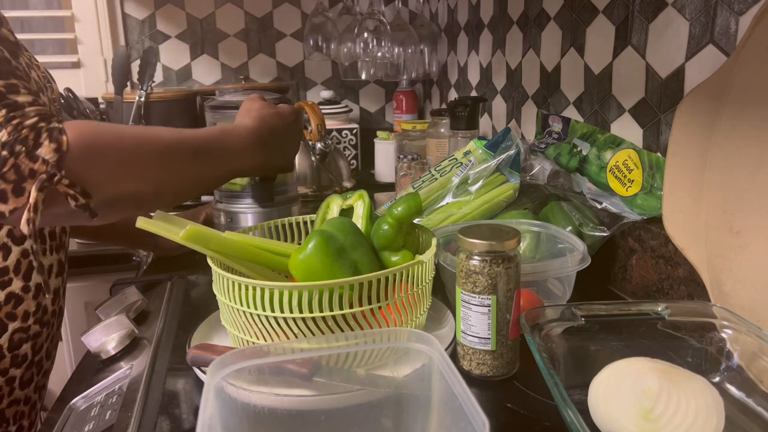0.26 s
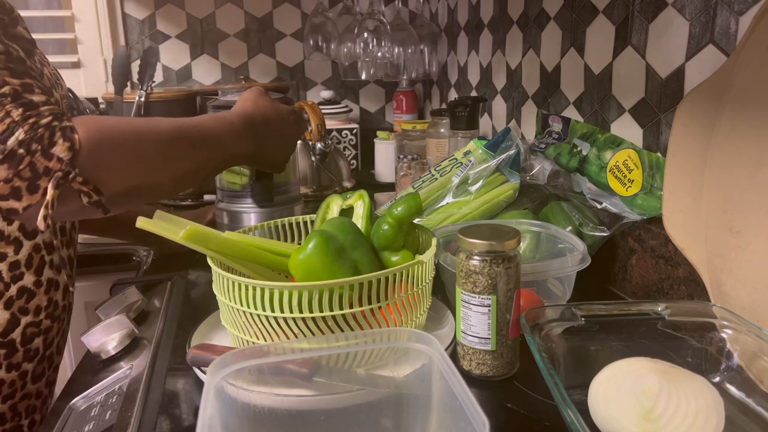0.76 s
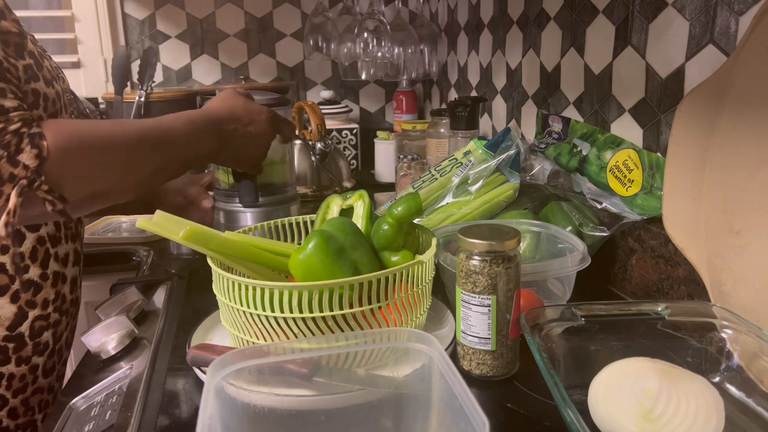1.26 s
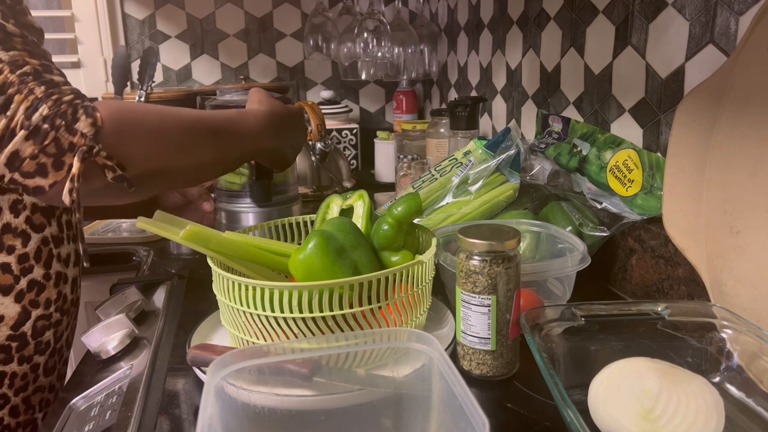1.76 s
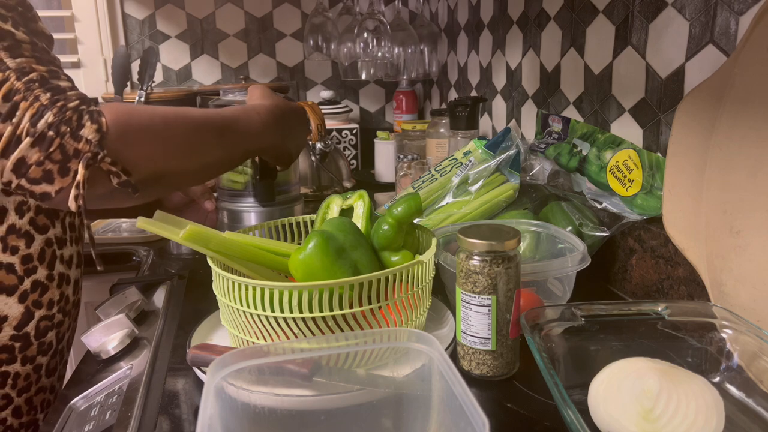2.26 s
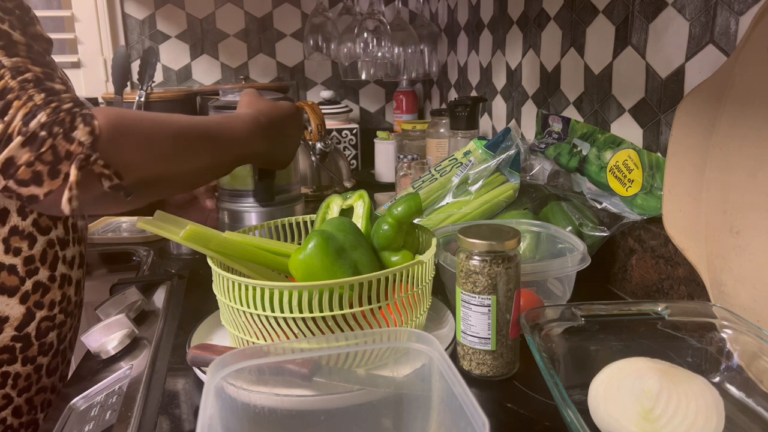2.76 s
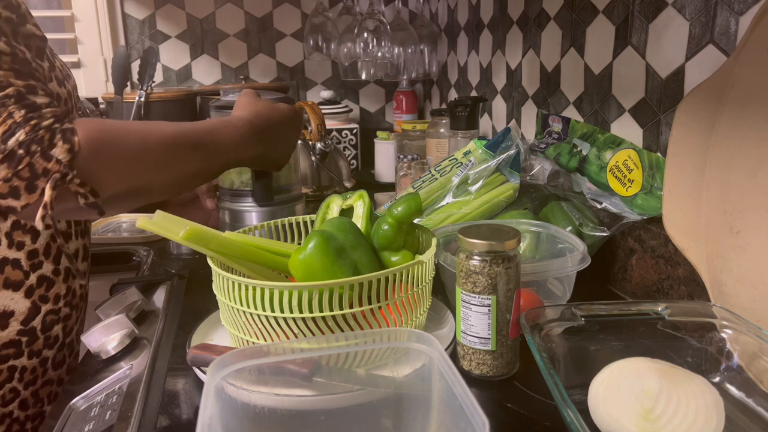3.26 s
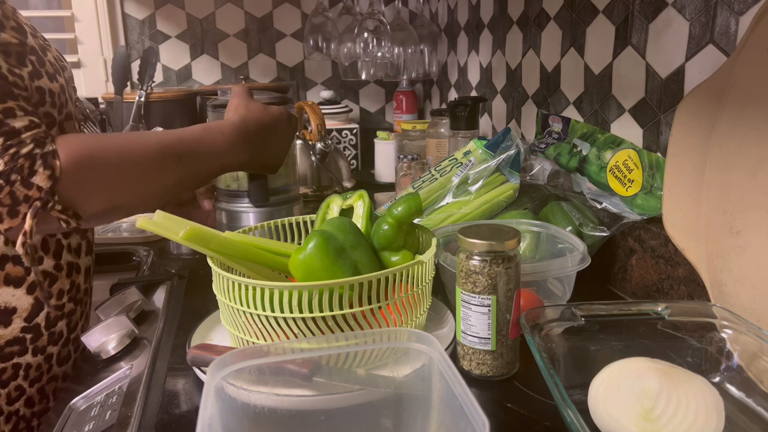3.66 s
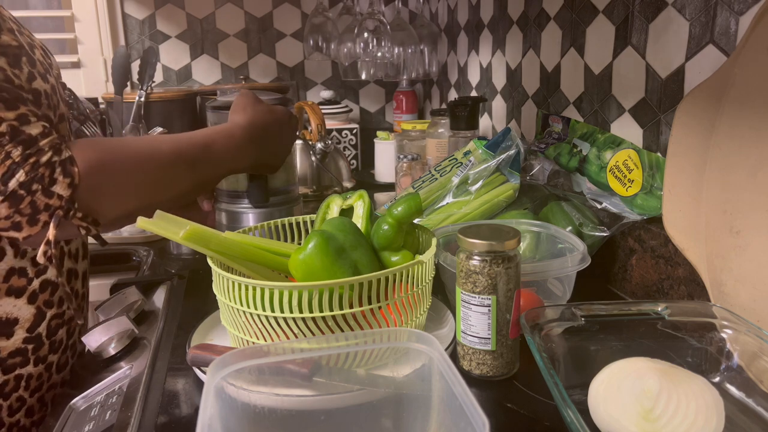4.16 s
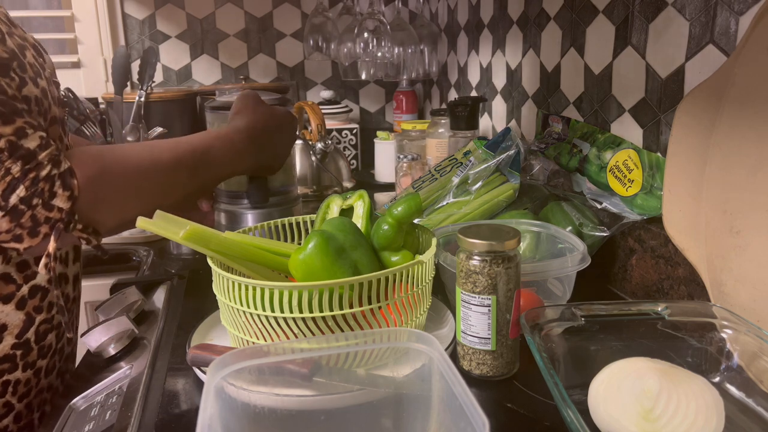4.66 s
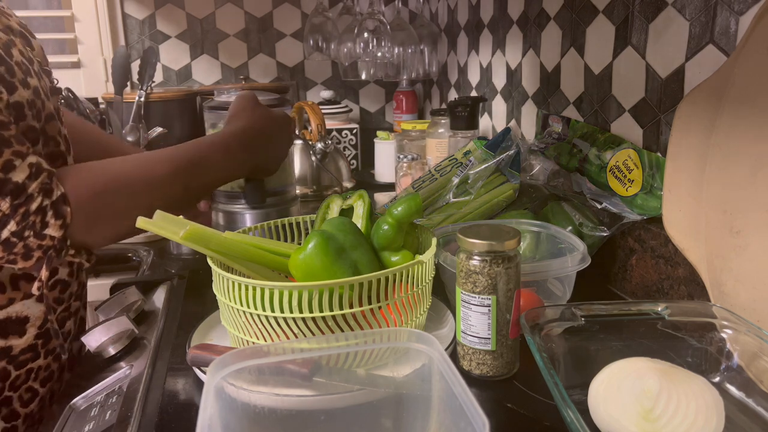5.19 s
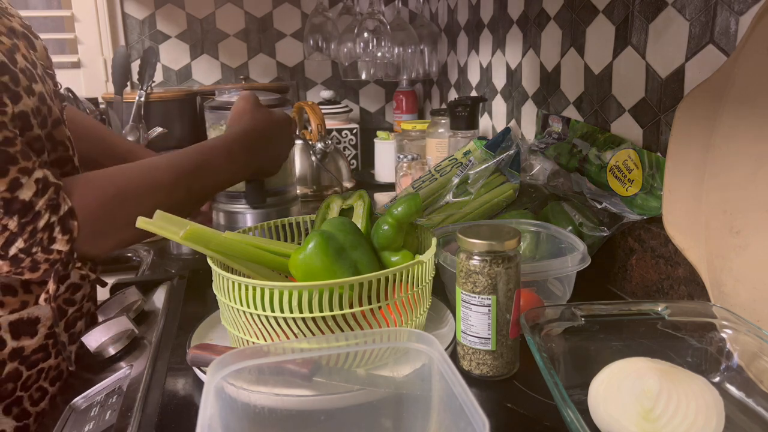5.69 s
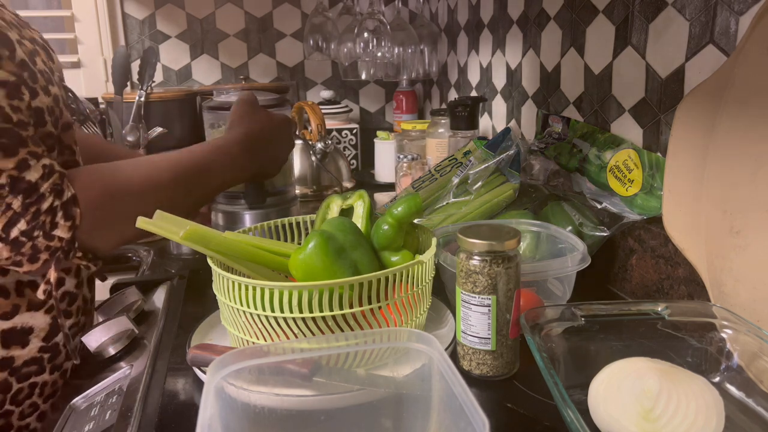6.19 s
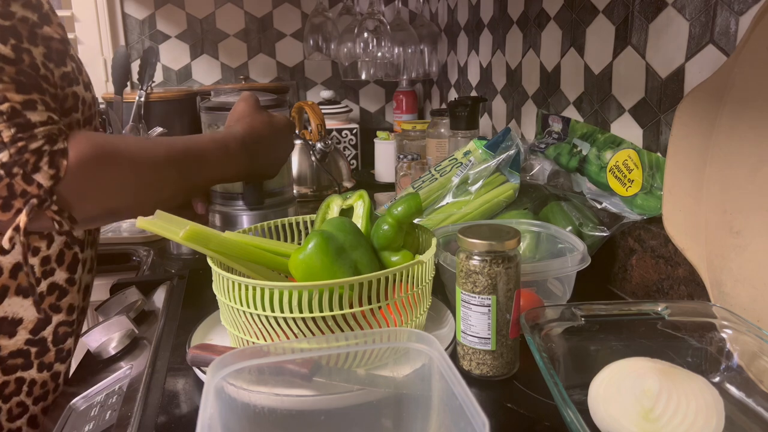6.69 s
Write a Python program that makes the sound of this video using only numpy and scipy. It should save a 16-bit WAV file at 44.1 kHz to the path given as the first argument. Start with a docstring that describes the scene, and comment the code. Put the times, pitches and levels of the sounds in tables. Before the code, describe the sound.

In a small tiled kitchen, a low fridge hum sits under light plastic ticks as a lid is fitted. Then a compact electric chopper spins up with a loud, nasal gear whine, hard vegetable pieces cracking and knocking in the bowl. A short pulse and two longer runs follow, each coasting down quickly. Close stereo pickup, short bright echo.

```python
"""Food chopper in a kitchen

A fridge hums while light ticks fit the lid of a small electric chopper; then four presses spin its motor up.
Gear tones follow the motor's speed through the resonant plastic housing; shaped noise churns and crunches as
food, and a low rumble shakes the counter. Decaying modes make the ticks, the hits on the bowl and the ring of
the blade; bursts of fading noise make the kitchen echo."""
import sys
import numpy as np
from scipy import signal
from scipy.fft import rfft, irfft, next_fast_len
from scipy.io import wavfile
from scipy.ndimage import map_coordinates

SR = 44100
rng = np.random.default_rng(int(sys.argv[2]) if len(sys.argv) > 2 else 0)


def pcm_store(signal):
    """Save signal as 16-bit PCM."""
    levels = np.round(np.clip(np.atleast_2d(signal), -1, 1) * 32767)
    wavfile.write(sys.argv[1], SR, levels.astype(np.int16).T)


N = 305613

# The four button presses. Each row: switch click [s], motor start [s], release [s], click level [dB before trims],
# motor level offset [dB], gear whine offset [dB].
PRESSES = [(2.329, 2.369, 3.642, -49, -0.5, 1), (3.8244, 3.845, 4.258, -36, -0.5, 0.9),
           (4.479, 4.49, 5.881, -33.5, -0.5, -0.1), (6.1384, 6.145, 7.566, -44.5, 0, 0.4)]


def amp(db):
    """Decibels to gain."""
    return 10 ** (np.asarray(db) / 20)


def unit(x):
    """Scaled to rms 1."""
    return x / np.sqrt(np.mean(np.abs(x) ** 2) + 1e-20)


def along(points, hz):
    """Read a curve of (Hz, value) points on a log frequency axis."""
    f, v = np.transpose(points)
    return np.interp(np.log(hz + 1), np.log(f + 1), v)


def wobble(rate):
    """A smooth random curve through `rate` knots a second."""
    knots = rng.standard_normal(int(N * rate / SR) + 4)
    return map_coordinates(knots, [np.arange(N) * rate / SR])


def filtered(x, response):
    """x times a complex response of frequency."""
    m = next_fast_len(N + SR // 2)
    spectrum = rfft(x, m) * response(np.fft.rfftfreq(m, 1 / SR))
    return irfft(spectrum, m)[..., :N]


def resonances(modes, f):
    """Causal response of (Hz, width, dB) modes, alternating in sign."""
    total = 0
    for k, (c, w, db) in enumerate(modes):
        total = total + (-1) ** k * amp(db) * 1j * f * w / (c * c - f * f + 1j * f * w)
    return total


def spread(pair):
    """Two signals become left and right by a mid/side mix whose width varies with frequency."""
    # Stereo likeness. Each row: frequency [Hz], left-right likeness [0 to 1].
    likeness = [(60, .99), (160, .97), (270, .85), (500, .55), (1000, .55), (2000, .45), (5000, .4),
                (8000, .65), (12000, .85)]

    def mid_side(hz):
        turn = np.arccos(np.clip(along(likeness, hz), -1, 1)) / 2
        return np.array([np.cos(turn), np.sin(turn)])

    mid, side = filtered(pair, mid_side)
    return np.array([mid + side, mid - side])


def blurred(phase, blur_hz, steady):
    """Two tones on one phase, their size and phase wandering through blur_hz random knots a second."""
    wander = [steady + wobble(blur_hz) + 1j * wobble(blur_hz) for _ in range(2)]
    return unit(np.real(np.array(wander) * np.exp(1j * phase)))


def kitchen(x):
    """The tiled walls answer with a noise tail, each frequency dying at its own speed."""
    # Echo decay. Each row: frequency [Hz], time to fall by 60 dB [s].
    decay = [(200, 0.27), (2000, 0.42), (6000, 0.36), (12000, 0.037)]
    hz, t, z = signal.stft(rng.standard_normal((2, SR // 2)), SR, nperseg=256)
    fading = z * amp(-60 * t / along(decay, hz)[:, None])
    tail = signal.istft(fading, SR, nperseg=256)[1]
    return signal.fftconvolve(x, tail / np.linalg.norm(tail[0]), axes=1)


def fridge():
    """A wavering compressor hum of blurred low tones over the still air of the room, a coloured noise."""
    # Hum tones. Each row: frequency [Hz], blur [random knots a second], level [dB], steadiness [ratio].
    hum_tones = [(58.6, 4.06, -46.5, 1.34), (118.4, 22, -45.5, 2.1), (167.5, 14, -63, 0.95),
                 (222, 14, -62, 0.75), (265, 14, -63, 1.1), (337, 7.8, -68.5, 0.61), (392, 10, -68, 1.5),
                 (443, 14, -71.5, .8)]
    # Colour of the air. Each row: frequency [Hz], relative level [dB].
    air_colour = [(25, -40), (35, -22), (45, -3), (70, -8.5), (100, -1.5), (150, -7.5), (260, -9),
                  (310, -22), (600, -25), (1000, -26.5), (2000, -32), (3000, -45), (4000, -51), (7000, -44),
                  (9000, -61), (12000, -78)]
    air_db = -50
    t = np.arange(N) / SR
    hum = sum(amp(db) * blurred(2 * np.pi * hz * t, blur_hz, steady) for hz, blur_hz, db, steady in hum_tones)
    air = unit(filtered(rng.standard_normal((2, N)), lambda f: amp(along(air_colour, f))))
    air = amp(1.1 * wobble(5.09)) * air  # the level wanders gently
    return spread(hum + amp(air_db) * air)


def ticks():
    """Each contact shakes the plastic's decaying modes and echoes, with its own balance of low and high modes."""
    # Lid and hand contacts. Each row: start [s], level [dB before trims], low modes [dB],
    # modes near 1 kHz [dB], brightness [dB], left minus right of the direct sound [dB].
    handling = [(0.0193, -50, 1, -5, -15, 0), (0.0493, -41.5, 6, -14, -2, 0),
                (0.3547, -45.5, -15, -12, -3, 3), (0.585, -59, 14, -3, -14, 2),
                (0.608, -51, 12, -3, -2.5, 3), (0.7214, -58, 6, -2, 4, 2), (0.79, -65, 0, -4, 0, 3),
                (0.82, -61, 0, -4, -3, 4), (0.8494, -58.5, 0, -2, -4, 5), (1.051, -52.5, 1, 3, -19, 2),
                (1.2744, -32.5, -31, -16, -7.5, 2.5), (1.3633, -41.5, -4, -11, -4, 2),
                (1.416, -34, 5, 10, -31, 0), (1.4242, -38.5, -2, -3, -14, 10),
                (1.5494, -57, 2, -7, -22, -2), (1.7444, -38, -13, -9, -10, 1), (1.7712, -52.5, 6, -4, 9, 2),
                (1.815, -55, 11, -8, 11, -3)]
    # Hard pieces hitting the bowl. Each row: start [s], level [dB before trims], low and 1 kHz modes [dB].
    thrown = [(2.4374, -16, -15), (2.487, -30, -1), (2.512, -18, 2), (2.532, -24, 4), (2.579, -19, -5),
              (2.626, -22, -9), (2.654, -20.5, -9), (2.725, -20.5, -7), (2.7956, -17.5, -9),
              (2.824, -21.5, -11), (3.013, -24, -16), (3.352, -28, -20), (3.42, -26, -13),
              (3.571, -24, -11), (3.648, -20.5, -7), (3.952, -36, -21), (5.006, -33, -24),
              (5.4396, -29, -15), (6.157, -41, 0), (6.27, -27, -18), (6.312, -26, -21), (6.456, -28, -16),
              (6.7203, -28, -8)]
    # Ringing plastic. Each row: frequency [Hz], relative level [dB], time to fall by 60 dB [s].
    plastic_modes = [(200, -6, 0.052), (322, 2, 0.023), (475, -3, 0.033), (640, -5, 0.033),
                     (868, -5, 0.016), (1090, 1.5, 0.031), (1484, 3, 0.027), (1855, -1.5, 0.043),
                     (2350, 7.5, 0.035), (2950, -1, 0.016), (3680, -3, 0.025), (4730, 1, 0.026),
                     (5333, 8.5, 0.05), (6650, 10.5, 0.031), (7410, -17, 0.022), (8770, 5.5, 0.035)]
    switch_colour = (-13, -7, 2.5, -2)  # low modes, modes near 1 kHz, brightness, left minus right, all in dB
    bowl_colour = (-5.5, 1)  # brightness, left minus right, in dB
    out, t = np.zeros((2, N + SR)), np.arange(SR // 5) / SR
    hz, level, t60 = np.transpose(plastic_modes)[:, :, None]
    clicks = [(row[0], row[3], *switch_colour) for row in PRESSES]
    hits = [(s, db, low, low, *bowl_colour) for s, db, low in thrown]
    for s, db, low_db, boxy_db, bright_db, pan_db in handling + clicks + hits:
        balance = [(480, low_db + 7.5), (850, boxy_db), (1100, boxy_db), (1500, 0), (3800, 0), (5000, bright_db)]
        colour = level + rng.normal(0, 1.6, hz.shape) + along(balance, hz)
        # loose parts smear the pitch: the phase walks at random
        drift = np.cumsum(rng.standard_normal((len(hz), len(t))), axis=1) * np.sqrt(2.2 * hz / SR)
        modes = amp(colour - 60 * t / t60) * np.sin(2 * np.pi * hz * t + drift)
        ring = np.sum(modes, axis=0) * np.minimum(t / 0.0033, 1)  # short attack
        sound = amp(-6.0) * kitchen(ring[None])
        sound[:, :len(t)] += amp(np.array([[.5], [-.5]]) * pan_db) * ring
        out[:, round(s * SR):][:, :sound.shape[1]] += amp(db - 2.5) * sound
    return filtered(out[:, :N], lambda f: 1 / (1 + 1j * f / 7000) ** 2)  # blunt edges, little treble


def motor(t):
    """Share of running speed, level dB and whine dB: each press spins up, each release coasts to a stop."""
    spin_up_s, eager = .1, .55  # time constant, curvature of the start
    coast_s, braking = .24, 2.1  # time to a stop, curvature of the coast
    coast_db = -1.5  # unloaded teeth sing less once the button is released
    share, level_db, load_db = np.full(N, 1e-3), np.zeros(N), np.zeros(N)
    for _, on, off, _, db, whine_db in PRESSES:
        powered_s = np.clip(np.minimum(t, off) - on, 0, None)
        rise = (1 - np.exp(-powered_s / spin_up_s)) ** eager
        coast = np.clip(1 - (t - off) / coast_s, 0, 1) ** braking
        share = np.maximum(share, rise * coast)
        level_db = np.where(t > on, db, level_db)
        unloading = np.clip((t - off) / 0.039, 0, 1)
        load_db = np.where(t > on, whine_db + coast_db * unloading, load_db)
    return share, level_db, load_db


def whine(shaft, order, blur_hz, skirt_db):
    """A smeared tooth tone with side tones whole turns apart and a broad skirt, coloured by the housing."""
    # Housing resonances. Each row: frequency [Hz], width [Hz], relative level [dB].
    housing_modes = [(1295, 94, -5), (1566, 36, 10), (1674, 38, 0), (1869, 48, 11), (2020, 60, 0.5),
                     (2180, 39, -6), (2320, 49, 1.5), (3020, 150, -26), (3400, 310, -3), (4190, 29, -20)]
    uneven = 1 + 0.58 * np.cos(shaft) + 0.31 * np.cos(2 * shaft + 1.2)  # the gear runs off centre
    tone = uneven * blurred(order * shaft, blur_hz, steady=0.45)
    skirt = amp(skirt_db) * blurred(.99 * order * shaft, 750, steady=0)
    return unit(filtered(tone + skirt, lambda f: 0.89 + resonances(housing_modes, f)))


def bites():
    """Gain curve of irregular blade bites over a steady floor: sudden rise, quick decay."""
    bites_per_s, bite_s, bite_db = 80, .008, 3.5  # mean rate, decay time constant, spread of size
    chance = rng.random((2, N))
    size = amp(-bite_db * np.log(chance[1] + 0.0012))
    kicks = (chance[0] < bites_per_s / SR) * size
    return 1.45 + signal.fftconvolve(kicks, np.exp(-np.arange(SR // 10) / SR / bite_s))[:N]


def chopper():
    """Gear whine, churning and crunching food, and shaking passed into the counter, all led by motor speed."""
    # Running speed that the load of food allows. Each row: time [s], tooth rate before jolts [Hz].
    running = [(2.4, 1961), (2.7, 1870), (2.82, 1987), (3.64, 2029), (3.95, 1952), (4.12, 2021),
               (4.2, 1890), (4.26, 1954), (4.6, 1953), (4.74, 1899), (4.8, 2018), (5.05, 2016), (5.4, 1900),
               (5.89, 1947), (6.3, 1906), (6.5, 1814), (6.62, 1992), (6.93, 2029)]
    # Large pieces left in the bowl. Each row: time [s], added noise before each part takes its share [dB].
    chunks = [(2.37, 19), (2.43, 11.5), (2.52, 13), (2.66, 12), (2.8, 7.5), (2.9, 8), (3.6, 4), (4.2, 4.5),
              (5, 1.5), (6.9, -1)]
    # Loudness of whine, octave, twelfth, churn, crunch, rumble. Each row: base level at full speed [dB],
    # drop per halving of speed [dB], swell at half speed [dB], share of chunk noise [ratio], wander [dB].
    parts = [(-30, 7.5, 9, -0.08, 1.5), (-35, 5, 6, -0.17, 1.5), (-46.5, -3, 0, .3, -1),
             (-28.5, 8, -1, 0.41, 0), (-42, 5, 6, 1.35, 2.5), (-37.5, 5.5, 3, 0.76, 0.86)]
    # Colour of churning food. Each row: frequency [Hz], relative level [dB].
    churn_colour = [(500, -11.5), (750, -9.5), (1100, -4), (1900, 3), (2800, -4), (3700, -4), (4600, -9.5),
                    (5000, -2.5), (5350, -5), (5800, -1.5), (7500, -7.5), (9300, -10.5), (11500, -17.5),
                    (13500, -27.5), (15800, -41)]
    # Colour of crunching food. Each row: frequency [Hz], relative level [dB].
    crunch_colour = [(300, -12), (400, 1), (470, 6), (560, -1), (750, -2), (1000, 1), (1400, -3.5),
                     (2500, 0), (5000, -10), (9000, -29)]
    # Counter resonances. Each row: frequency [Hz], width [Hz], relative level [dB].
    counter_modes = [(116.5, 40, 0.5), (182, 39.6, 0), (212.6, 19.4, 0.5), (262, 75, -3.5),
                     (355, 107, -6.5), (420, 58, -0.5), (477, 67, 1.5)]
    teeth, wander_hz = 12, 9  # teeth a turn, random knots a second of the level wander
    stumble, stumble_hz = .012, 25.08  # share by which food jolts the speed, random knots a second
    chatter, chatter_hz = .05, 139.96  # same for tooth chatter, strongest at half speed
    t = np.arange(N) / SR
    share, level_db, load_db = motor(t)
    chunk_db = np.interp(t, *np.transpose(chunks))
    half_speed = np.sin(np.pi * share)  # peaks at half speed
    levels = []
    for db, halving_db, swell_db, part, wander_db in parts:
        speed_db = halving_db * np.log2(share) + swell_db * half_speed
        levels.append(level_db + db + speed_db + part * chunk_db + wander_db * wobble(wander_hz))
    whine_db, octave_db, twelfth_db, churn_db, crunch_db, rumble_db = levels

    jolts = 1 + stumble * wobble(stumble_hz) + chatter * half_speed * wobble(chatter_hz)
    tooth_hz = share * np.interp(t, *np.transpose(running)) * jolts
    shaft = 2 * np.pi * np.cumsum(tooth_hz) / SR / teeth
    skirt_db = 24 * (tooth_hz / 2000 - 1)  # rattle grows with speed
    slow_db = -.03 * np.maximum(1400 - tooth_hz, 0)  # slow teeth barely sing
    gears = amp(whine_db + slow_db) * whine(shaft, teeth, 80, skirt_db + 2.5)
    gears += amp(octave_db) * whine(shaft, 2 * teeth, 210, skirt_db + 1.5)
    gears += amp(twelfth_db) * whine(shaft, 3 * teeth, 120, skirt_db + 1)
    gears *= amp(load_db - .025 * np.maximum(1150 - tooth_hz, 0))

    knocks = amp(0.99 * wobble(25) + 1.4 * wobble(300))  # pieces strike blade and bowl unevenly
    noise = rng.standard_normal((3, 2, N))
    churn = unit(filtered(knocks * noise[0], lambda f: amp(along(churn_colour, f))))
    crunch = unit(filtered(knocks * bites() * noise[1], lambda f: amp(along(crunch_colour, f))))

    def counter(f):
        band = f ** 2 / (f ** 2 + 90 ** 2) / (1 + (f / 600) ** 4)
        return resonances(counter_modes, f) * band

    unbalance = amp(-7.5 - .4 * chunk_db) * blurred(shaft, 15, steady=2.2)  # one push a turn
    rumble = unbalance + unit(filtered(noise[2], counter))
    mix = gears + amp(churn_db) * churn + amp(crunch_db) * crunch + amp(rumble_db) * rumble
    mix = mix * (t > PRESSES[0][1])  # silent until the motor first starts
    return spread(mix + amp(-8.0) * kitchen(mix)[:, :N])


def blade():
    """The blade catches on hard pieces: each gives a bright noise crack and a short ring of the steel's modes."""
    # Catches. Each row: start [s], level [dB before the ring and crack are summed].
    catches = [(2.375, -23.5), (2.951, -24.5), (3.191, -27)]
    # Ringing steel. Each row: frequency [Hz], mean relative level [dB], time to fall by 60 dB [s].
    steel_modes = [(1080, 2, 0.034), (2350, -3, 0.041), (3500, -3, 0.044), (4730, 1.5, 0.052),
                   (5530, 3.5, 0.057), (6800, -3, 0.032)]
    out, t = np.zeros(N + SR), np.arange(SR // 10) / SR
    for s, db in catches:
        ring = np.zeros(len(t))
        for hz, level, t60 in steel_modes:
            ring += amp(level + rng.normal(0, 2.5) - 60 * t / t60) * np.sin(2 * np.pi * hz * t)
        crack = 0.46 * amp(-60 * t / 0.11) * rng.standard_normal(len(t))
        out[round(s * SR):][:len(t)] += amp(db) * (ring + crack) * np.minimum(t / 0.0016, 1)
    return out[:N]


def scene():
    """Machine, blade and ticks in the kitchen, over the hum."""
    return chopper() + blade() + ticks() + fridge()


def record(dry):
    """The two ports differ in level by band, and in timing above the bass; nothing passes the band limit."""
    # Level tilt. Each row: frequency [Hz], left minus right [dB].
    lean = [(30, 3), (70, 1.5), (150, -2), (380, 0.5), (950, 4), (2380, 1), (5980, 8), (9000, 1),
            (15000, -1.5)]
    # Timing. Each row: frequency [Hz], phase by which left leads before the bass fade [radians].
    phase_lead = [(300, 21), (600, 2.5), (950, 1.43), (2330, 1.44), (2760, 4), (5000, 4.5), (7670, 1),
                  (8610, -3.5), (9650, -18), (12600, -10.5), (15100, -33)]
    top_hz = 15800
    halves = [.5, -.5]  # left, right

    def ports(hz):
        lead = along(phase_lead, hz) * np.clip(hz / 250 - 1.8, 0, 1)  # fades in from 450 to 700 Hz
        gain = amp(np.outer(halves, along(lean, hz)))
        return gain * np.exp(1j * np.outer(halves, lead)) * (hz < top_hz)

    return filtered(dry, ports)


dry = scene()
out = record(dry)
pcm_store(out)
```